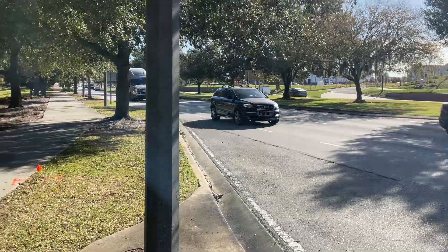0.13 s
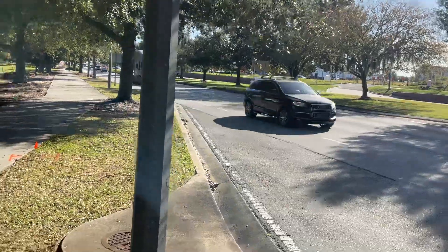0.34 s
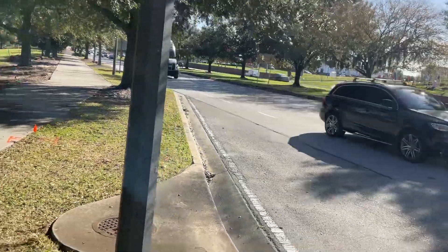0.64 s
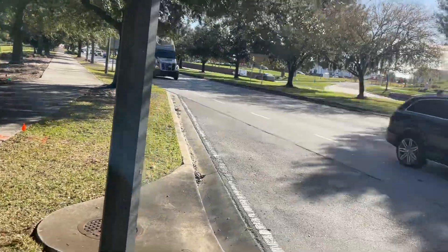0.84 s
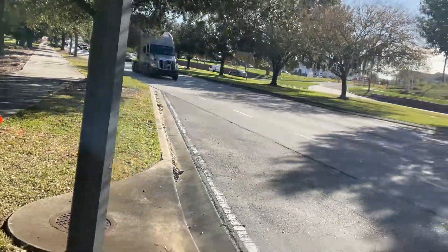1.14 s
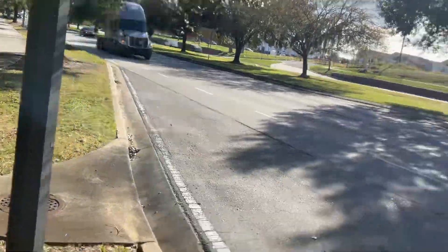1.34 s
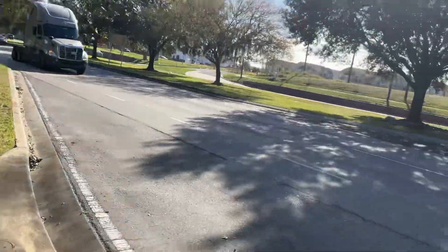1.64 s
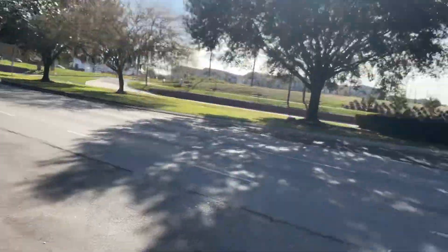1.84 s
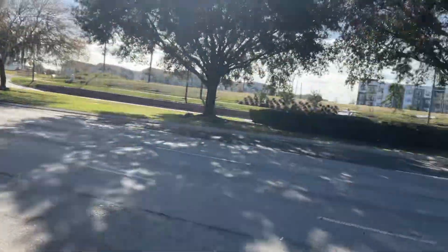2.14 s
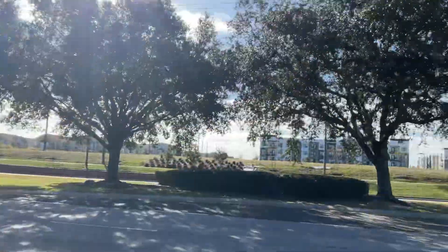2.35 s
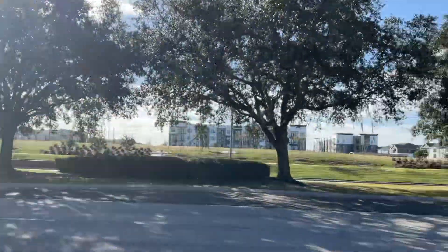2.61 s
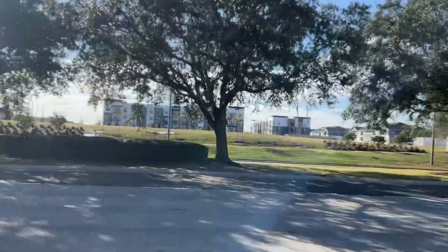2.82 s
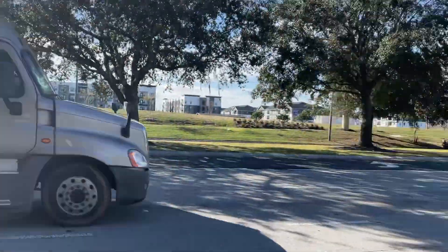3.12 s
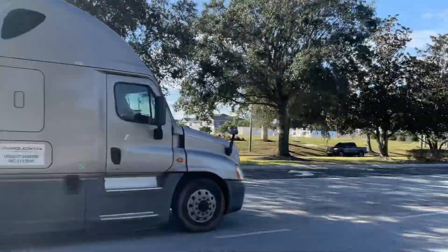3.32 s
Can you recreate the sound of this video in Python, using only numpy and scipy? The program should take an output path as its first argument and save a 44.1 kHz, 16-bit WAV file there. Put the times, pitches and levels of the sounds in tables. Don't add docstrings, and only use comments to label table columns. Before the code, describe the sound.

A heavy truck drives past close by on an open road. Car tyre roar comes first and fades, then diesel rumble, hiss, thuds and rattles build, ending with a low horn swell, heard on a hand-held stereo microphone.

```python
import sys
import numpy as np
from scipy import signal
from scipy.io import wavfile
from scipy.ndimage import uniform_filter1d

SR = 44100
rng = np.random.default_rng(int(sys.argv[2]) if len(sys.argv) > 2 else 0)


def transcribe(u):
    v = np.clip(np.atleast_2d(u).T, -1, 1)
    q = np.round(v * 32767).astype(np.int16)
    wavfile.write(sys.argv[1], SR, q)


def volts(x):
    e = np.asarray(x, float) / 20
    return 10 ** e


N = 153027

# time in seconds, level in dB.
CARS_AWAY = [(0, 0), (.35, 0.5), (.65, 0), (.95, -1), (1.25, -2), (1.6, -4.5), (2.1, -7), (2.7, -11.5),
             (3.47, -2)]
# time in seconds, engine firing rate in Hz, nearness in dB,
# grille hiss in dB, pitch of the airy whistle in Hz.
TRUCK_PASS = [(0, 62.57, -26, -13.5, 5900), (1, 62.65, -11, -7.5, 6070), (1.6, 63, -9, -9.5, 6050),
              (2, 62.56, -5.5, -5, 6100), (2.35, 62.66, -4, -4.5, 6430), (2.6, 62.98, 0, -3, 8200),
              (2.8, 62.5, -0.5, -1, 9000), (2.97, 61.4, 1, 0.5, 8800), (3.15, 59.54, 2, 0, 8000),
              (3.28, 57.3, -1.5, -2.5, 6500), (3.47, 57.8, -4, -5.5, 5740)]
# frequency in Hz, strength in dB per Hz.
CAR_COLOURS = [
    [(15, -59), (25, -58), (35, -79), (49, 8), (81, -2.5), (117, 0), (150, -6), (179, -5), (480, -3.5),
     (620, -34), (1060, -120)],
    [(280, -37), (480, -9.5), (668, -1.5), (931, -5.5), (1090, -4), (1600, -7), (2040, -12.5),
     (2590, -27.5), (2900, -42), (3770, -63), (6380, -120)],
    [(1710, -26), (2900, -2.5), (3310, 0), (3950, -0.5), (6060, -12.5), (6590, -24), (9160, -17.5),
     (13300, -33), (15500, -30)],
]
CAR_LEVELS = [-27.5, -24.5, -43]
CAR_SHARES = [0.51, 1.25, 1]
# frequency in Hz, strength in dB per Hz.
TRUCK_COLOURS = [
    [(15, -50), (25, -25), (38, -5), (119, -4), (215, -5.5), (259, -7), (289, -9), (366, -9), (480, -19.5),
     (620, -31), (1060, -120)],
    [(280, -80), (480, -9), (634, -7), (795, -1.5), (1300, -13.5), (1660, -12.5), (1960, -20.5),
     (2690, -27), (2900, -35.5), (3770, -65), (6380, -120)],
    [(1710, -58), (2900, -8), (3070, -7.5), (3710, -0.5), (5050, -1.5), (6020, 1), (9230, -5.5),
     (10200, -8), (15500, -21)],
]
TRUCK_LEVELS = [-17.5, -25, -37.5]
TRUCK_SHARES = [0.83, 0.73]
# frequency in Hz, likeness from 0 to 1.
PORT_LIKENESS = [(60, .99), (200, .96), (400, .85), (700, .85), (1300, .5), (2500, .75), (4500, .95),
                 (7000, .9995)]
# multiple of the firing rate, level in dB, wander in Hz.
ENGINE_TONES = [(1.68, -28, 5.3), (2, -23, 1.6), (3, -35.5, 10.6), (4, -35, 6.8), (6, -38, 5)]
# multiple of the horn's base pitch, level in dB.
HORN_TONES = [(3, -30), (4, -26.5), (5, -32), (5.4, -39)]
# time in seconds, peak in dB, pitch in Hz, length in cycles.
AXLE_THUDS = [(2.506, -13, 111, 2), (2.623, -8, 124, 1.9), (2.643, -9.5, 250, 1.8), (2.673, -13, 112, 3.5),
              (2.708, -9, 130, 1.5), (2.771, -8, 120, 1.5), (2.8, -10.5, 165, 2.3), (2.856, -5.5, 130, 2.4),
              (2.918, -6, 135, 1.03), (3.113, -9.5, 125, 1.8), (3.233, -18.5, 110, 2.3),
              (3.277, -9.5, 121, 2.45), (3.425, -10.5, 120, 3)]
# time in seconds, peak in dB, pitch in Hz, length in seconds.
METAL_RATTLES = [(2.122, -37, 6500, .006), (2.347, -39, 6500, .008), (2.386, -31, 6900, .009),
                 (2.428, -34, 6500, 0.027), (2.497, -34, 6300, .012), (2.553, -35, 8000, 0.008),
                 (2.574, -34, 8000, .009), (2.628, -37.5, 8200, 0.022), (2.715, -33, 7040, .008),
                 (2.765, -40, 5784, .008), (2.805, -36, 11100, 0.0069), (2.843, -36, 7000, .008),
                 (2.88, -34, 5830, .009), (2.915, -32, 9200, .01), (2.956, -31, 7600, 0.0073),
                 (3.01, -34, 7950, .008), (3.072, -31, 5850, 0.0089), (3.117, -37, 5900, .01),
                 (3.152, -33, 7560, .006), (3.218, -36, 10300, 0.02)]
# frequency in Hz, strength in dB per Hz.
PUFF_COLOUR = [(3000, -20), (6000, -9), (9000, 0), (15500, -13)]
# frequency in Hz, lead in radians.
CAR_LEAD = [(300, 0), (690, 2), (950, 1.8), (1210, .8), (2330, -2.6), (3010, -3.7), (4310, -6.28),
            (15200, -6.28)]
TRUCK_LEAD = [(260, .2), (600, 2.2), (860, 3), (1210, 1), (1890, 1.1), (2500, -2.1), (3700, -5.4),
              (4570, -6.28)]
# frequency in Hz, left over right in dB.
CAR_LEAN = [(60, -1.5), (270, -2.5), (450, -4), (740, 1.5), (1220, 2.5), (2010, -1), (4700, 0), (5800, -3),
            (7500, -3), (7900, 0)]
TRUCK_LEAN = [(60, -1), (270, -4), (450, -2), (740, 8), (1220, 5), (2010, -1), (5500, -3.5), (7400, -2.5),
              (7900, 0)]
# time in seconds, centre in Hz, depth in dB (minus cuts).
BOUNCE = [(0, 530, -10.5), (.7, 463, 1.5), (1.3, 514, -8), (1.7, 630, -19), (2.2, 622, -8), (2.8, 620, -11),
          (3.47, 530, 3.5)]
# time in seconds, level in dB.
ENGINE_LOAD = [(0, -12.5), (1.4, -9), (2.3, -2.5), (2.9, 0), (3.25, -3), (3.47, -3.5)]
# start and end in seconds,
# centre from and to in Hz.
BAND_HOLES = [(.055, .17, 2880, 2900), (.19, .275, 2680, 2660), (.305, .415, 2650, 2630),
              (.415, .62, 2660, 2720), (.62, .695, 2800, 2850)]
# time in seconds, length in seconds, pitch in Hz, width in Hz, rise in dB.
TREAD_HUM = [(0.645, 0.034, 870, 80, 5), (.76, .06, 770, 130, 5), (.86, 0.034, 710, 120, 7),
             (1, .02, 710, 120, 7.5), (0.97, .03, 730, 98, 5), (1.074, 0.045, 710, 99, 6.5),
             (1.187, 0.068, 740, 81, 8), (0.99, .15, 1140, 56, 4.5), (0.97, .12, 1610, 81, 4),
             (1.64, 0.21, 1330, 210, 6)]

BOUNCE_WIDE_HZ, BOUNCE_RIGHT_SHARE = 88, 0.3
HORN_HZ, HORN_START_S, HORN_RISE_S, HORN_WANDER_HZ = 64.9, 3.13, 0.14, 10
RATTLE_SPREAD = 0.08
PUFF_S, PUFF_LEN_S, PUFF_DB = 1.695, 0.028, -49
GRIT_DB, GRIT_PER_S = -53, 700
WHISTLE_DB, WHISTLE_WIDE_HZ, WHISTLE_S, WHISTLE_LEN_S = 5.5, 800, 2.55, 0.33
BRIGHTEN = 0.44
EXHAUST_S, EXHAUST_RISE_S, EXHAUST_HZ, EXHAUST_WIDE_HZ, EXHAUST_DB = 3.2, 0.15, 310, 130, 6.5
LOW_CUT_HZ, HOLE_WIDE_HZ, MONO_S, MONO_HZ, START_S = 45, 175, 2.4, 6500, 0.0362


def evened(x):
    return x / np.sqrt(np.mean(abs(x) ** 2) + 1e-20)


def read(points, hz):
    f, value = np.transpose(points)
    return np.interp(np.log(hz + 1), np.log(f + 1), value)


def curve(table, t):
    rows = np.transpose(table)
    return [np.interp(t, rows[0], row) for row in rows[1:]]


def noise(colour, lead, balance, size, patchy_db, flicker_db, extra=None):
    hop = size // 4
    frames, hz = N // hop + 5, np.fft.rfftfreq(size, 1 / SR)
    a, b, c, d, patches = rng.standard_normal((frames, len(hz), 5)).T
    flicker = uniform_filter1d(patches, size=len(hz) // 6, axis=0)
    flicker = evened(uniform_filter1d(flicker, size=3, axis=1))
    patches = uniform_filter1d(patches, size=5, axis=0)
    patches = evened(uniform_filter1d(patches, size=14, axis=1))

    same = np.clip(read(PORT_LIKENESS, hz), 0, 1)[:, None]
    lean = volts(read(balance, hz) / 2)[:, None]
    turn = np.exp(-1j * read(lead, hz))[:, None]
    left = a + 1j * b
    right = same * left + np.sqrt(1 - same ** 2) * (c + 1j * d)
    z = np.array([lean * left, turn / lean * right])
    both = np.sqrt(lean ** 2 + lean ** -2 + 2 * same * turn.real)

    inside = (hz > colour[0][0]) & (hz <= colour[-1][0])
    shape = (read(colour, hz) - 90 * ~inside)[:, None]
    z *= volts(shape + patchy_db * patches + flicker_db * flicker) / both
    if extra is not None:
        z *= volts(extra(hz[:, None], np.arange(frames) * hop / SR))
    out = signal.istft(z, nperseg=size, noverlap=size - hop)[1][:, :N]
    return out / np.std(out.mean(0))


def tone(hz, wander_hz):
    r = np.exp(-np.pi * wander_hz / SR)
    a, b = rng.standard_normal((2, N))
    smooth = signal.lfilter([1], [1, -r], a + 1j * b)
    waver = evened(signal.lfilter([1], [1, -r], smooth))
    spin = np.exp(2j * np.pi * np.cumsum(hz) / SR)
    return evened(((1 + 0.067 * wander_hz * waver) * spin).real)


def road_bounce(hz, s):
    centre, depth = curve(BOUNCE, s)
    hollow = depth * np.exp(-((hz - centre) / BOUNCE_WIDE_HZ) ** 2)
    return np.array([hollow, BOUNCE_RIGHT_SHARE * hollow])


def tread_hum(hz, s):
    swells = sum(db * np.exp(-((s - at) / length) ** 2 - ((hz - f) / wide) ** 2)
                 for at, length, f, wide, db in TREAD_HUM)
    return road_bounce(hz, s) + swells


def cars(t):
    level, = curve(CARS_AWAY, t)
    looks = [(4096, 1.57, 0.17), (1024, 0.55, 0.59), (512, 1.25, 0.47)]
    return sum(volts(db + share * level) * noise(colour, CAR_LEAD, CAR_LEAN, *look, tread_hum)
               for colour, db, share, look in zip(CAR_COLOURS, CAR_LEVELS, CAR_SHARES, looks))


def puff(t):
    middle = [(1, 0), (9, 0)]
    air = noise(PUFF_COLOUR, middle, middle, 256, 0.55, 0.6)
    return volts(PUFF_DB) * np.exp(-((t - PUFF_S) / PUFF_LEN_S) ** 2) * air


def rattles(t):
    out = np.zeros(N)
    draws = rng.standard_normal((len(METAL_RATTLES), 2, 30))
    for (s, db, hz, length), draw in zip(METAL_RATTLES, draws):
        at = slice(round((s - 0.002) * SR), round((s + 4 * length) * SR))
        u = abs(t[at] - s + 0.0015)
        pitches = hz * (1 + RATTLE_SPREAD * draw[0][:, None])
        ring = np.sin(2 * np.pi * pitches * u + 3 * draw[1][:, None]).sum(0)
        fade = np.minimum(u / 0.0028, 1) * np.exp(-(u / length) ** 1.6)
        out[at] += volts(db) * 0.17 * ring * fade
    return out


def thuds(t):
    return sum(volts(db) * np.exp(-((t - s) * hz / cycles * 3.7) ** 2) * np.cos(2 * np.pi * hz * (t - s))
               for s, db, hz, cycles in AXLE_THUDS)


def horn(t):
    swell = np.clip((t - HORN_START_S) / HORN_RISE_S, 0, 1)
    tones = sum(volts(db) * tone(k * HORN_HZ + 0 * t, HORN_WANDER_HZ) for k, db in HORN_TONES)
    return swell * tones * volts([[-1.8], [1.8]])


def grit(hiss):
    clicks = volts(3.6 * np.minimum(rng.exponential(1, N), 3.5)) * (rng.random(N) < GRIT_PER_S / SR)
    strength = np.sqrt(signal.oaconvolve(clicks ** 2, np.hanning(100))[:N].clip(0))
    burst = strength * rng.standard_normal(N)
    return volts(GRIT_DB + 2 * hiss) * evened(np.convolve(burst, [1, 0, -1, -1, 0, 1], "same"))


def grille_whistle(hz, s):
    _, _, hiss, pitch = curve(TRUCK_PASS, s)
    when = ((s - WHISTLE_S) / WHISTLE_LEN_S) ** 2
    where = ((hz - pitch) / WHISTLE_WIDE_HZ) ** 2
    return WHISTLE_DB * np.exp(-when - where) + BRIGHTEN * hiss * np.log2(np.maximum(hz / 6000, 1))


def exhaust(hz, s):
    rise = np.clip((s - EXHAUST_S) / EXHAUST_RISE_S, 0, 1)
    boom = np.exp(-((hz - EXHAUST_HZ) / EXHAUST_WIDE_HZ) ** 2)
    return road_bounce(hz, s) + EXHAUST_DB * rise * boom


def diesel(t, rate):
    tones = sum(volts(db) * tone(k * rate, wander) for k, db, wander in ENGINE_TONES)
    return volts(curve(ENGINE_LOAD, t)[0]) * tones * volts([[-0.9], [0.9]])


def truck(t):
    rate, near, hiss, _ = curve(TRUCK_PASS, t)
    ports = TRUCK_LEAD, TRUCK_LEAN
    rumble = noise(TRUCK_COLOURS[0], *ports, 2048, 0.65, 2.14, exhaust)
    tyres = noise(TRUCK_COLOURS[1], *ports, 1024, 1.27, 0.97, road_bounce)
    air = noise(TRUCK_COLOURS[2], *ports, 256, 0.66, 0.88, grille_whistle)
    out = volts(TRUCK_LEVELS[0] - 4.0 + TRUCK_SHARES[0] * near) * rumble
    out += volts(TRUCK_LEVELS[1] + TRUCK_SHARES[1] * near) * tyres
    out += volts(TRUCK_LEVELS[2] + hiss) * air
    return out + grit(hiss) + diesel(t, rate)


def scene():
    t = np.arange(N) / SR
    return cars(t) + puff(t) + rattles(t) + thuds(t) + horn(t) + truck(t)


def band_limit(x):
    return signal.sosfilt(signal.butter(12, 15660, fs=SR, output="sos"), x)


def record(dry):
    t = np.arange(N) / SR
    cut = signal.sosfilt(signal.butter(4, LOW_CUT_HZ, "high", fs=SR, output="sos"), dry)

    hz, s, z = signal.stft(cut.mean(0), SR, nperseg=1024, noverlap=768)
    lost = sum((s > a) & (s < b) & (abs(hz[:, None] - np.interp(s, [a, b], [f, g])) < HOLE_WIDE_HZ)
               for a, b, f, g in BAND_HOLES)
    cut = cut - signal.istft(z * lost, SR, nperseg=1024, noverlap=768)[1][:N]

    treble = signal.butter(8, MONO_HZ, "high", fs=SR, output="sos")
    side = signal.sosfiltfilt(treble, cut[0] - cut[1]) / 2
    cut = cut - side * (t > MONO_S) * np.array([[1], [-1]])
    opening = np.clip((t - START_S) / 0.0015, 0, 1)
    return band_limit(cut * opening)


dry = scene()
out = record(dry)
transcribe(out)
```